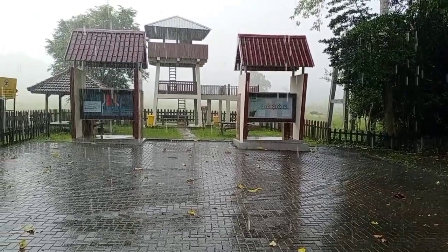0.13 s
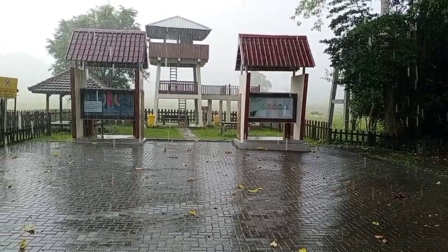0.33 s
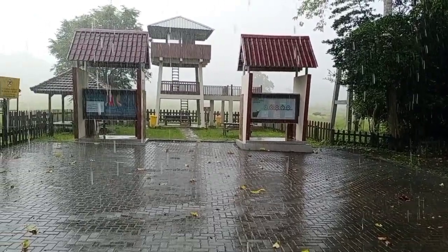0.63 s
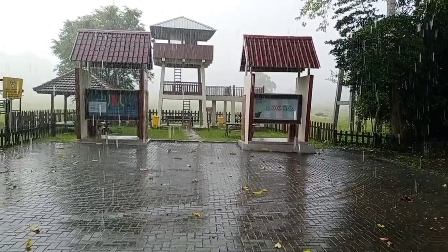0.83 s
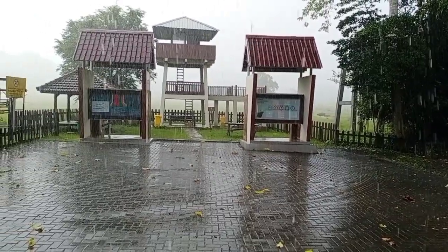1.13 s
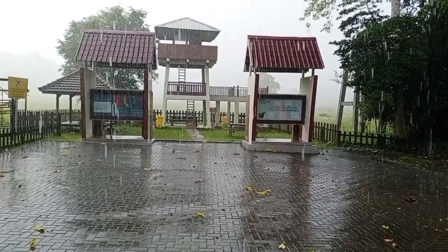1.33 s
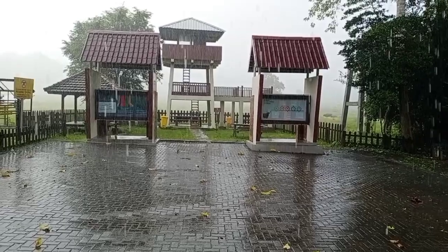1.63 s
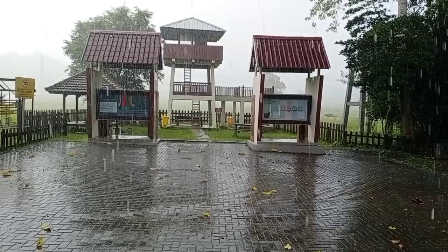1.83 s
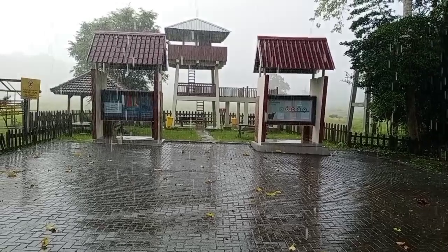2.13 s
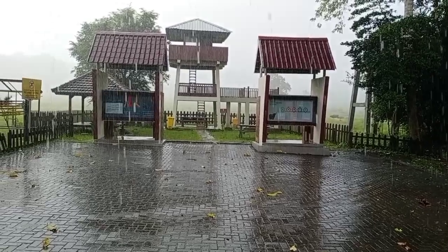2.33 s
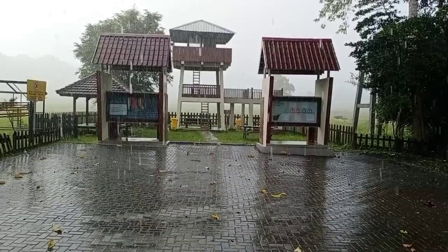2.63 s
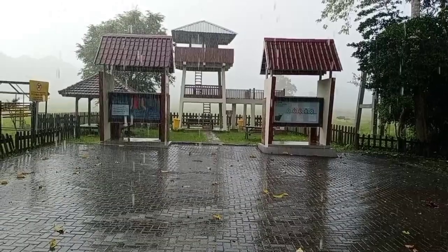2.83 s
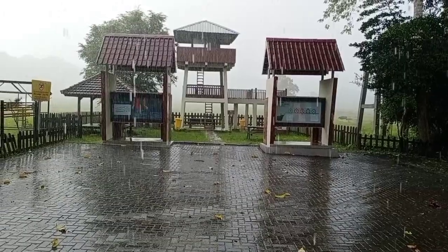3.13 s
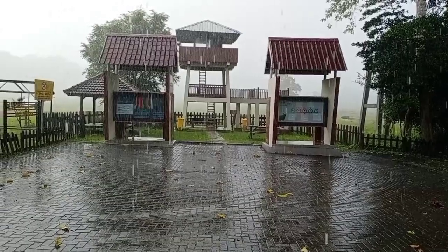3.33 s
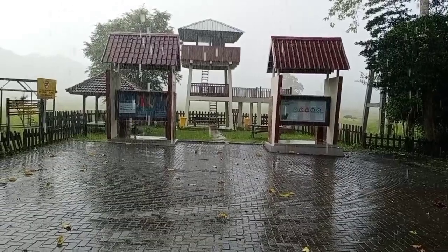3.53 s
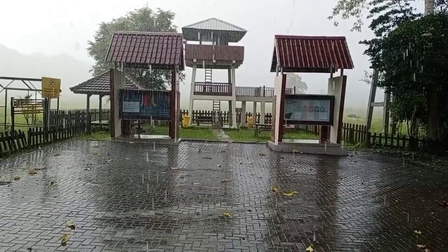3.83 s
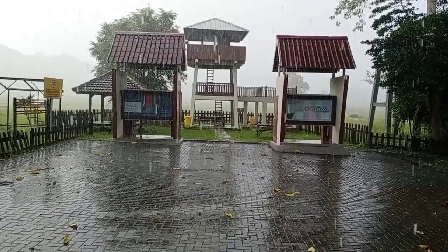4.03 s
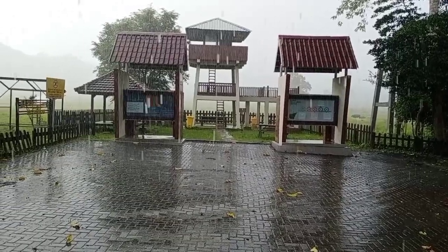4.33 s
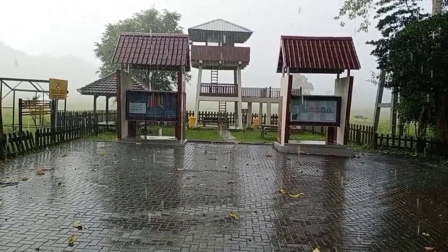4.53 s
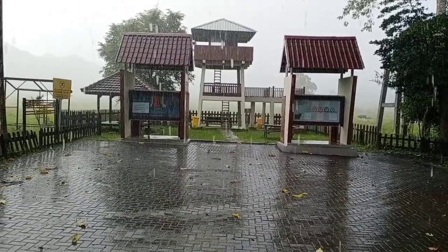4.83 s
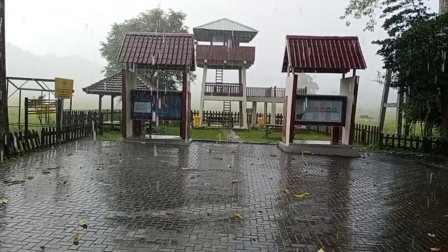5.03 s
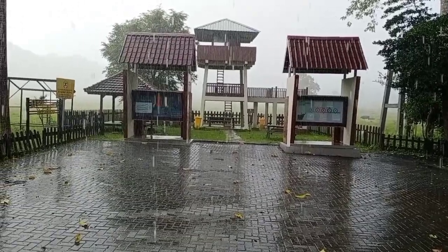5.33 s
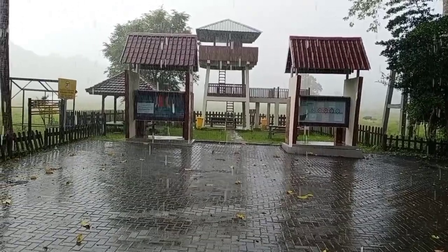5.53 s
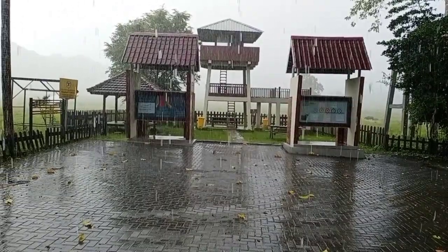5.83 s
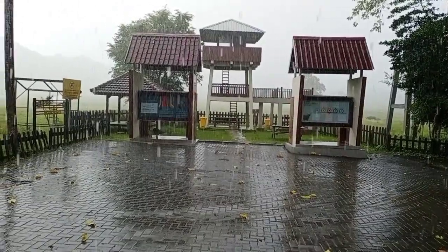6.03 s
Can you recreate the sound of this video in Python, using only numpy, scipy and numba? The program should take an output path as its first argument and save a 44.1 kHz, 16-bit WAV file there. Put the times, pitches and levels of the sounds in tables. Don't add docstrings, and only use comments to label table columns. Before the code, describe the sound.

A dense downpour captured by one phone microphone close to wet paving. Rain slaps brick, bubbles in puddles, drums dully on tiled roofs and sizzles as fine spray, rippling quickly but never stopping. Slowing makes it coarse and fluttery, like a buzzing texture. Soft gusts bump underneath, strongest around three seconds. Two lone close drops tick, then a small crisp cluster arrives near 5.5 seconds. The rain simply continues to the end.

```python
import sys
import numpy as np
from scipy import signal
from scipy.fft import rfft, irfft
from scipy.io import wavfile
from scipy.ndimage import uniform_filter1d, map_coordinates
from numba import njit

SR = 44100
rng = np.random.default_rng(int(sys.argv[2]) if len(sys.argv) > 2 else 0)


def generate_wav(sig):
    pcm = np.round(np.clip(np.atleast_2d(sig).T, -1, 1) * 32767).astype(np.int16)
    wavfile.write(sys.argv[1], SR, pcm)


def field_ratio(decibels):
    return 10 ** (np.asarray(decibels, dtype=float) / 20)


N = 272538
SPEED = 0.36
LIVE = int(N * SPEED) + 4096


def unit(x):
    return x / np.sqrt(np.mean(x ** 2) + 1e-20)


def coloured(x, spectrum):
    points_hz, points_db = np.transpose(spectrum)
    hz = np.fft.rfftfreq(len(x), 1 / SR)
    gain_db = np.interp(np.log(hz + 1), np.log(points_hz + 1), points_db, -120, -120)
    return unit(irfft(rfft(x) * field_ratio(gain_db), len(x)))


def curves(rows):
    time_s, *columns = np.transpose(rows)
    return [np.interp(np.arange(N) / SR, time_s, column) for column in columns]


def swells(rows):
    centre_s, width_s, *lifts_db = np.transpose(rows)
    phase = np.clip((np.arange(N) / SR - centre_s[:, None]) / width_s[:, None], -1, 1)
    return np.array(lifts_db) @ np.cos(phase * np.pi / 2) ** 2


def wobble(rate):
    return map_coordinates(rng.standard_normal(N // 100), [np.arange(N) * rate / SR])


@njit
def repeats(x, count, speed, shortest, longest, lean):
    ahead, lags = np.zeros(3 * count, np.int64), np.zeros(3 * count, np.int64)
    fade = np.zeros(3 * count)
    at, put = 0, 0
    while put < count:
        gaps = [np.abs(x[at:at + k + 40] - x[at + k:at + 2 * k + 40]).mean() / k ** lean
                for k in range(shortest, longest)]
        lag = shortest + np.argmin(np.array(gaps))
        step = max(int((speed * (put + lag) - at) / (1 - speed)), 1)
        ahead[put:put + lag + step] = at + np.arange(lag + step)
        lags[put + lag:put + lag + step] = lag
        fade[put + lag:put + lag + step] = np.arange(step) / step
        at, put = at + step, put + lag + step
    return ahead[:count], (ahead - lags)[:count], fade[:count]


def find_grain(far):
    heard = coloured(far, [(300, -20), (1200, 0), (2200, 0), (4000, -14)])
    return repeats(heard, N, SPEED, SR // 800, SR // 50, 0.04)


def slowed(x, grain):
    ahead, behind, fade = grain
    return (1 - fade) * x[ahead] + fade * x[behind]


def patter(far, patchy_db, drop_db, spread_db):
    z = signal.stft(far, nperseg=256)[2]
    field = uniform_filter1d(rng.standard_normal(z.shape), size=4, axis=0)
    field = uniform_filter1d(field, size=4, axis=1)
    merged = signal.istft(z * field_ratio(patchy_db * unit(field)), nperseg=256)[1][:LIVE]
    hit = rng.random(LIVE) < 0.03
    near = hit * rng.standard_normal(LIVE) * field_ratio(spread_db * rng.standard_normal(LIVE))
    return unit(merged) + field_ratio(drop_db) * unit(near)


# time_s, level_db
DOWNPOUR = [(0, -25), (.3, -26.5), (.95, -26), (1.25, -27.5), (1.62, -26), (1.75, -27.5), (2.2, -26.5),
            (2.75, -28), (2.95, -27), (3.4, -29), (3.55, -25.5), (3.7, -28), (3.9, -25.5), (4.2, -28.5),
            (4.8, -26.5), (5.28, -28.5), (5.9, -26.5), (6.18, -29)]


def downpour():
    return curves(DOWNPOUR)[0]


# centre_s, width_s, puddle_lift_db, splash_lift_db
SHEETS = [(.11, 0.19, 3, 0), (.57, 0.087, 2, 5), (.87, 0.08, 2, 0.5), (1.12, 0.19, -0.5, 1.5),
          (1.5, 0.075, 5.5, 1.5), (1.63, .15, 3, 0), (2.09, 0.21, 4, 3), (2.33, 0.15, 5, 3),
          (2.57, 0.058, -1.5, 2), (3.07, .3, 2, 2.5), (3.57, 0.2, 3, 0.5), (3.88, 0.11, 2, 1),
          (4.15, 0.14, 0, 2.5), (4.38, 0.082, 3, 2.5), (4.63, .3, 3.5, 2), (5.09, 0.16, -0.5, 4.5),
          (5.27, 0.075, 4, 3.5), (5.4, 0.087, 4, 2.5), (5.7, 0.12, 4.5, 3), (6.07, 0.12, 3, 2.5)]


def sheets():
    return swells(SHEETS)


# pitch_hz, level_db
PAVING_COLOUR = [(440, -32), (750, -21), (1020, -3.5), (2300, 0.5), (2650, -6.5), (3440, -31), (5830, -120)]


def paving(far, grain, rain_db):
    drops = patter(far, patchy_db=0.6, drop_db=-20.0, spread_db=6.5)
    return field_ratio(rain_db - 0.09) * coloured(slowed(drops, grain), PAVING_COLOUR)


# pitch_hz, level_db
PUDDLE_COLOUR = [(1560, -46), (2650, -0.5), (3700, 4.5), (4400, -8.5), (5720, -27), (9680, -120)]


def puddles(far, grain, surge_db, lift_db, dense):
    level_db = -30.5 + 0.2 * surge_db + lift_db + 0.5 * dense + 1.2 * wobble(30)
    drops = patter(far, patchy_db=1.5, drop_db=-6.5, spread_db=-2.5)
    return field_ratio(level_db) * coloured(slowed(drops, grain), PUDDLE_COLOUR)


# pitch_hz, level_db
ROOF_COLOUR = [(160, -34), (280, -16.5), (360, -14.5), (611, -3), (850, -2), (1100, -13), (1870, -120)]
# time_s, level_db
RUNOFF = [(0, -36), (.5, -40.5), (1.1, -36.5), (1.55, -41.5), (1.9, -40), (2.35, -39.5), (2.48, -40),
          (2.67, -36.5), (2.88, -45.5), (3.07, -38), (3.2, -41.5), (3.55, -38), (4.4, -40), (4.66, -34.5),
          (4.8, -40.5), (5.3, -40), (5.57, -42), (6.18, -40.5)]


def roofs(far, grain):
    runoff_db, = curves(RUNOFF)
    usual_db = runoff_db.mean()
    level_db = usual_db - 3 + 1.46 * (runoff_db - usual_db) + 1.16 * wobble(20)
    drops = patter(far, patchy_db=0.3, drop_db=-8, spread_db=0.5)
    return field_ratio(level_db) * coloured(slowed(drops, grain), ROOF_COLOUR)


# pitch_hz, level_db
SPLASH_COLOUR = [(2590, -27), (4400, -4), (5590, -1.5), (7870, -12.5), (9190, -18), (9920, -17.5),
                 (11400, -23), (14800, -52), (22000, -120)]


def splash(far, grain, surge_db, lift_db, dense):
    level_db = -39 + 0.1 * surge_db + lift_db + 0.27 * dense + 0.92 * wobble(25)
    drops = patter(far, patchy_db=1.5, drop_db=-7.0, spread_db=2)
    return field_ratio(level_db) * coloured(slowed(drops, grain), SPLASH_COLOUR)


# pitch_hz, level_db
SPRAY_COLOUR = [(6760, -36), (11500, -7.5), (12800, -2.5), (14800, -1), (15400, 0.5), (15600, -2)]
# centre_s, width_s, lift_db
DRIFTS = [(.95, .2, 1.5), (1.41, .08, -4), (1.75, .2, -2), (2.2, .5, 1.5), (2.84, .15, 1.5),
          (2.95, 0.12, -3), (3.45, .1, -4), (4.23, 0.09, -1.5), (5.48, .08, -2), (5.55, .05, 1),
          (5.6, .15, 3)]


def spray(high, grain, dense):
    drift_db, = swells(DRIFTS)
    drops = patter(high, patchy_db=1.5, drop_db=-9.5, spread_db=5.0)
    return field_ratio(-46 + drift_db + 0.76 * dense) * coloured(slowed(drops, grain), SPRAY_COLOUR)


# time_s, level_db
BREEZE = [(0, -67), (1, -69), (2.2, -69), (2.84, -69.5), (3.3, -57), (3.9, -62), (4.7, -59), (5.3, -67),
          (6.18, -70.5)]
# centre_s, width_s, thud_lift_db, flutter_lift_db
GUSTS = [(.42, 0.15, 13, 4.5), (.85, 0.089, 12, 12), (1.28, 0.19, -6, 6.5), (1.45, .1, 9, 0),
         (1.7, 0.25, 6, 7.5), (2.03, .1, 11, 5), (2.15, .08, 8, 2), (2.31, 0.21, 13, 8.5), (2.5, .12, 2, 6),
         (2.72, 0.11, 13, 9), (2.94, 0.11, 15, 14), (3.07, 0.1, 20, 11.5), (3.55, .12, 4, 5),
         (3.73, 0.18, 12, 7), (3.83, 0.083, 4, 4), (4.02, 0.21, 5, 11.5), (4.13, 0.092, 6, -2),
         (4.52, 0.15, 10, 12.5), (4.7, .12, -15, 8), (4.81, 0.11, 6, 6.5), (5.05, .1, 4, 4),
         (5.2, .1, 13, 3), (5.43, 0.12, 8, 10.5), (5.6, 0.12, 7, 8.5)]
# pitch_hz, level_db
THUD_COLOUR = [(12, -38), (20, -2), (40, 8), (90, -1), (120, -37), (200, -120)]
# pitch_hz, level_db
FLUTTER_COLOUR = [(56, -34), (95, -2.5), (135, 1.5), (330, -4.5), (430, -19), (730, -120)]


def wind(air, grain):
    breeze_db, = curves(BREEZE)
    thud_lift, flutter_lift = swells(GUSTS)
    gusty = field_ratio(1.05 * wobble(9)) * slowed(air, grain)
    thud = field_ratio(breeze_db + thud_lift) * coloured(gusty, THUD_COLOUR)
    flutter_db = -59 + 0.6 * (breeze_db - breeze_db.mean()) + flutter_lift
    return thud + field_ratio(flutter_db) * coloured(gusty, FLUTTER_COLOUR)


def weather():
    far, high, air = rng.standard_normal((3, LIVE))
    grain = find_grain(far)
    rain_db = downpour()
    surge_db = rain_db - rain_db.mean()
    puddle_lift, splash_lift = sheets()
    dense = wobble(15)
    ground = paving(far, grain, rain_db) + puddles(far, grain, surge_db, puddle_lift, dense)
    bright = splash(far, grain, surge_db, splash_lift, dense) + spray(high, grain, dense)
    return ground + roofs(far, grain) + bright + wind(air, grain)


# start_s, level_db
SPITS = [
    (2.3146, -27),
    (2.8374, -29),
    (5.5185, -31),
    (5.5245, -31),
    (5.529, -27),
    (5.533, -21),
    (5.543, -21.5),
    (5.5447, -22),
    (5.586, -30),
]


def spits():
    x, t = np.zeros(N), np.arange(400) / SR
    for start_s, level_db in SPITS:
        puff = field_ratio(level_db + 5 - 60 * t / 0.008) * rng.standard_normal(len(t))
        x[round(start_s * SR):][:len(t)] += puff
    return signal.sosfilt(signal.butter(8, 13000, "high", fs=SR, output="sos"), x)


# centre_s, low_hz, high_hz, level_db
PARTING = [(2.535, 5170, 6500, -44), (3.745, 10300, 11900, -61), (3.815, 5100, 7100, -44),
           (4.23, 6800, 8400, -52), (4.275, 6200, 8400, -51), (4.275, 11000, 12500, -60),
           (4.465, 4200, 5300, -49), (4.95, 7500, 9800, -57), (5.72, 5130, 6460, -40),
           (5.74, 6200, 7600, -52), (5.74, 11000, 12500, -56)]


def parting():
    side, bump = np.zeros(N), np.hanning(2000) ** 0.7
    for centre_s, low_hz, high_hz, level_db in PARTING:
        burst = coloured(rng.standard_normal(len(bump)), [(low_hz, 0), (high_hz, 0)])
        start = round(centre_s * SR) - len(bump) // 2
        side[start:][:len(bump)] += field_ratio(level_db) * bump * burst
    return np.array([side, -side])


def scene():
    return np.tile(weather() + spits(), (2, 1))


# pitch_hz, width_hz, level_db
PORT = [(9200, 250, -3.5), (11400, 250, -5.5)]


def microphone(dry):
    hz = np.fft.rfftfreq(N, 1 / SR)
    dips_db = sum(db * np.exp(-((hz - centre) / width) ** 2) for centre, width, db in PORT)
    band_limit = np.clip((15530 - hz) / 90, 0, 1)
    return irfft(rfft(dry) * field_ratio(dips_db) * band_limit, N)


def roll_off(x):
    return signal.sosfilt(signal.butter(12, 16820, fs=SR, output="sos"), x)


def record(dry):
    mix = microphone(dry) + parting()
    return roll_off(mix)


dry = scene()
out = record(dry)
generate_wav(out)
```